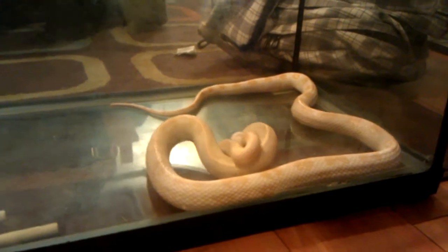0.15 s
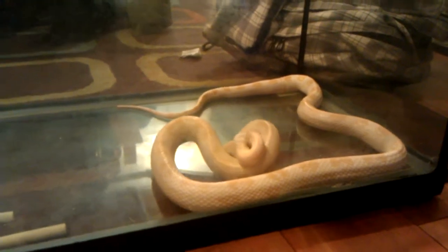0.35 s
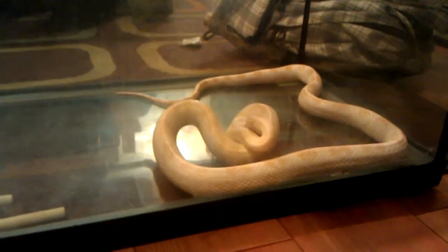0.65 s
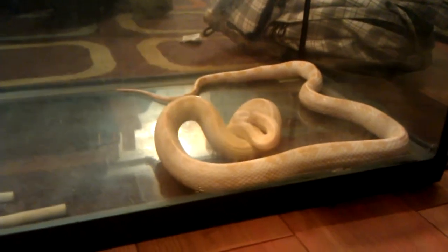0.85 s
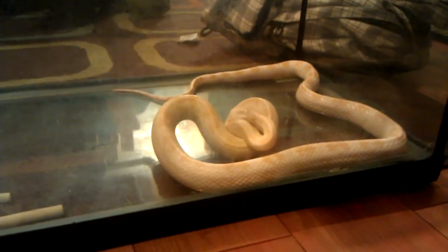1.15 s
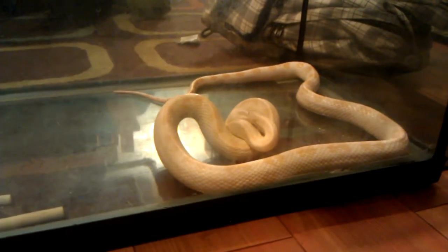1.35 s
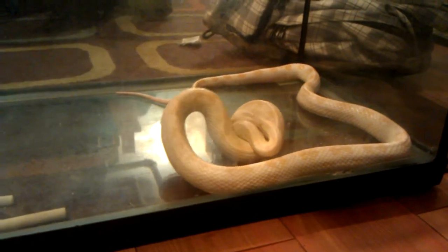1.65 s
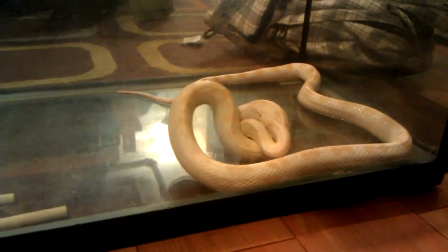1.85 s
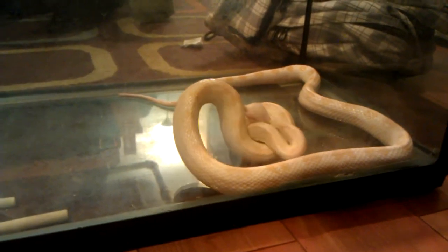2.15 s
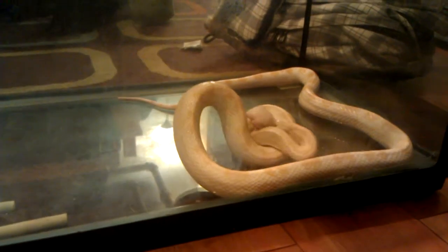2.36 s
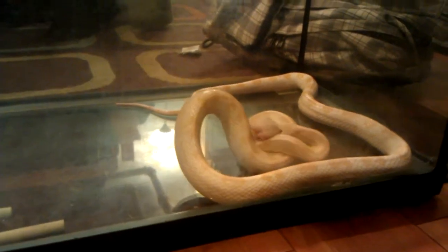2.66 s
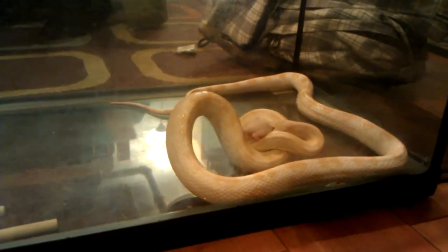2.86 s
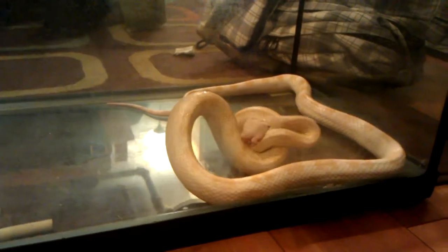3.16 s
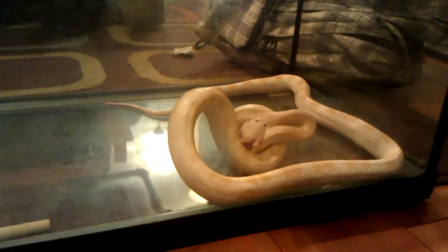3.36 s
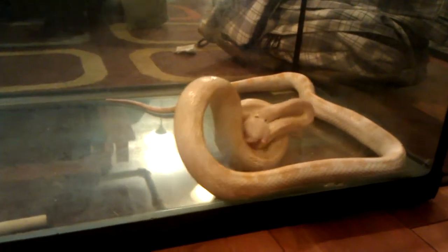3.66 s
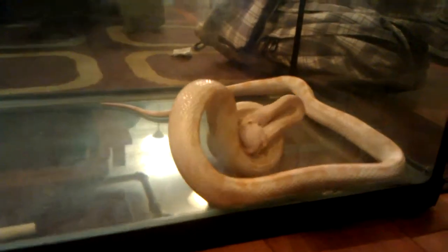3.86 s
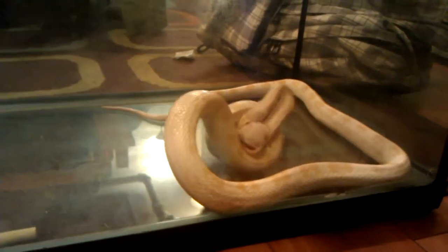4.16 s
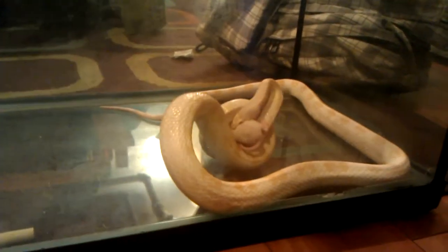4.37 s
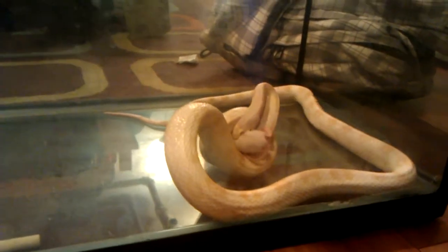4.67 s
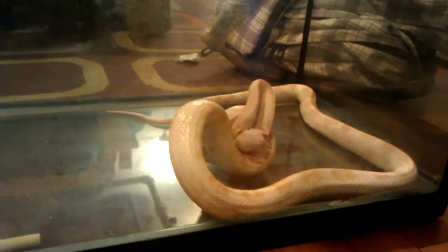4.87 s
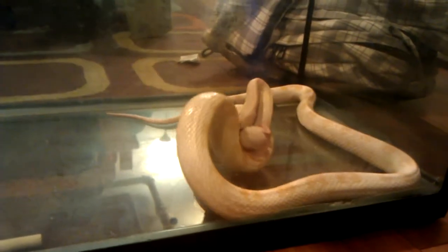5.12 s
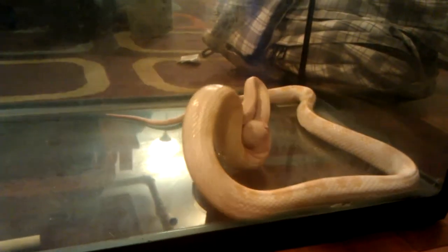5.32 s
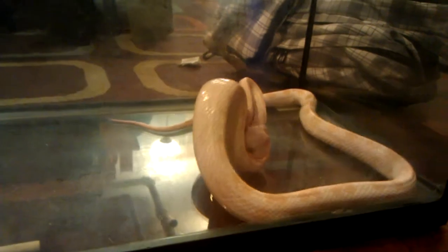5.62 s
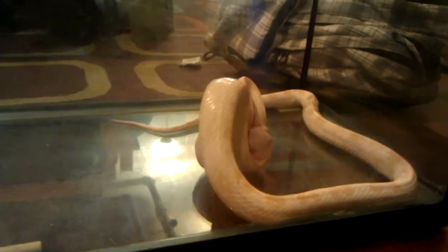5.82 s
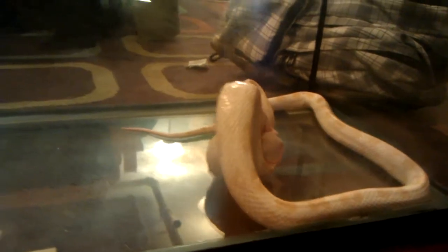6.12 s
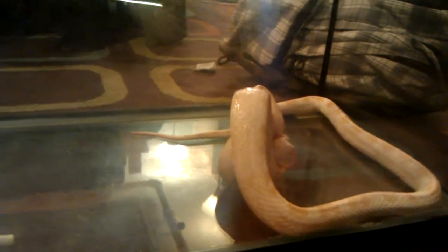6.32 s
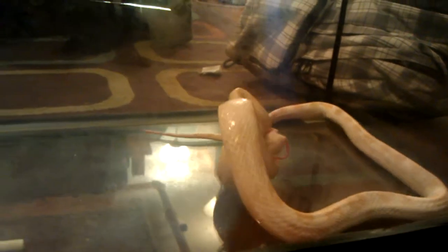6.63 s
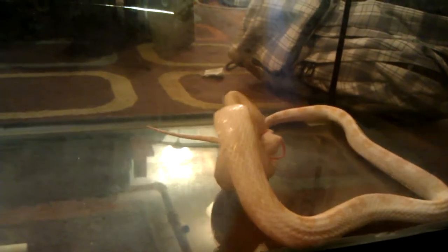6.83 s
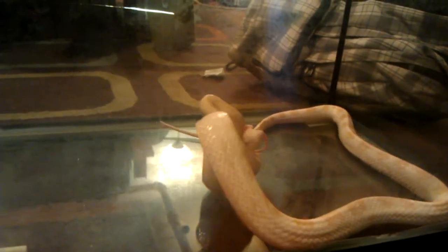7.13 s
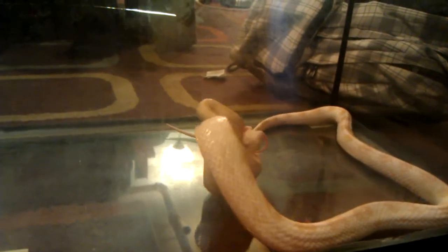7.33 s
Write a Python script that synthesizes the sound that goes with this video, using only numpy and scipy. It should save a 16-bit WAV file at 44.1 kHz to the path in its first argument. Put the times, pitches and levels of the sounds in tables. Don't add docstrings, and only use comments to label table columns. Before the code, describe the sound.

Seven short, strained rodent squeals ring reverberantly in a glass tank, with faint wheezes, soft scaly rubbing, low appliance hum and handling clicks.

```python
import sys
import numpy as np
from scipy import signal
from scipy.fft import rfft, irfft, next_fast_len
from scipy.io import wavfile
from scipy.ndimage import uniform_filter1d, map_coordinates

SR = 44100
rng = np.random.default_rng(int(sys.argv[2]) if len(sys.argv) > 2 else 0)


def unload_wav(signal):
    wavfile.write(
        sys.argv[1],
        SR,
        np.round(np.clip(np.atleast_2d(signal).T, -1, 1) * 32767).astype(np.int16),
    )


def linear_from_db(decibels):
    return 10 ** (np.asarray(decibels, float) / 20)


N = 330309
TIME = np.arange(N) / SR


def unit(x):
    return x / np.sqrt(np.mean(x ** 2) + 1e-20)


def along(points, hz):
    f, v = np.transpose(points)
    return np.interp(np.log(hz + 1), np.log(f + 1), v)


def curves(rows):
    s, *cols = np.transpose(rows)
    return [np.interp(TIME, s, c) for c in cols]


def gate(spans):
    inside = sum((TIME >= start) & (TIME <= end) for start, end in spans)
    return np.abs(uniform_filter1d(np.minimum(inside, 1.0), size=352))


def peak(s, db, rise, fade):
    return linear_from_db(db - np.where(TIME < s, rise * (s - TIME), fade * (TIME - s)))


def wobble(rate):
    knots = rng.standard_normal(int(N * rate / SR) + 4)
    return map_coordinates(knots, [TIME * rate])


def noise(gain):
    m = next_fast_len(N)
    spectrum = rfft(rng.standard_normal(m))
    hz = np.fft.rfftfreq(m, 1 / SR) + 1
    return unit(irfft(spectrum * gain(hz), m)[:N])


# frequency in Hz, level in dB per Hz.
ROOM_NOISE = [(26, -24), (74, -24), (100, -10), (140, -9), (220, -2.5), (300, -6.5), (420, -6), (640, -3.5),
              (950, -6.5), (1400, -9), (3900, -13), (5200, -21), (10000, -19), (15700, -21.5)]
# time in seconds, strength in dB.
ROOM_DB = [(0, -65), (.44, -63), (1.06, -66.5), (2.0, -66), (3.1, -64.5), (5.3, -65.5), (6.28, -64.5),
           (6.63, -66), (7.0, -64.5), (7.49, -65)]
# frequency in Hz, level in dB per Hz.
RUB = [(1200, -28), (2000, -2.5), (2800, -22.5), (3700, 0), (4600, 1.5), (5400, -6.5), (8000, -18),
       (15000, -33)]
# peak in seconds, spread in seconds, level in dB.
RUB_STROKES = [
    (0.3, .8, -63),
    (2.42, .15, -64),
    (3.18, .17, -58.5),
    (4.35, .14, -62),
    (5.15, .25, -63),
    (5.6, .2, -61),
    (6.15, .13, -62),
    (6.88, .13, -56),
]
# frequency in Hz, level in dB rms.
HUM = [(150.7, -80.5), (188.4, -78), (446.8, -81), (608.3, -79.5), (807.5, -78.5), (1604, -84.5),
       (1793, -82)]


def background():
    air_level = linear_from_db(curves(ROOM_DB)[0] + 1.5 + 0.8 * wobble(4))
    air = air_level * noise(lambda f: linear_from_db(along(ROOM_NOISE, f)))

    strokes = linear_from_db(-67)
    for s, spread, db in RUB_STROKES:
        strokes = strokes + linear_from_db(db) * np.exp(-((TIME - s) / spread) ** 2)
    rub = strokes * linear_from_db(-11.5 + 1.6 * wobble(4.46)) * noise(lambda f: linear_from_db(along(RUB, f)))

    beat_s, beat_peak_s, second_share = 4.1, 2.95, 0.65
    mains_hz, mains_db = 119.5, -79
    beat = np.abs(1 + second_share * np.exp(2j * np.pi * (TIME - beat_peak_s) / beat_s))
    mains_level = beat * linear_from_db(mains_db + 3.5 + 1.8 * wobble(9))
    mains = mains_level * np.sin(2 * np.pi * mains_hz * TIME + 0.4 * wobble(10))

    motor = np.zeros(N)
    for hz, db in HUM:
        motor += linear_from_db(db + 2 + 2.7 * wobble(14)) * np.sin(2 * np.pi * hz * TIME + 1.1 * wobble(8))
    return air + rub + mains + motor


# start in seconds, click level in dB, click t60 in seconds,
# snap level in dB, case thud level in dB.
TICKS = [
    (1.2741, -50, .0055, -41.5, -48.5),
    (3.6278, -27.5, .0086, -51, -60),
    (6.8064, -59, .0055, -56, -60),
    (7.1011, -47, .006, -46, -55),
]


def ticks():
    click_hz, thud_hz = 4150, 217
    out, t = np.zeros(N + SR), np.arange(SR // 8) / SR
    for s, click_db, t60, snap_db, thud_db in TICKS:
        ring = np.sin(2 * np.pi * click_hz * t)
        ring += 0.5 * np.sin(2 * np.pi * 1.21 * click_hz * t)
        ring += 0.13 * np.cos(2 * np.pi * 800 * t)
        click = linear_from_db(click_db - 60 * t / t60) * ring
        snap = linear_from_db(snap_db - 60 * t / 0.005) * uniform_filter1d(rng.standard_normal(len(t)), size=5)
        thud = linear_from_db(thud_db - 60 * (t / 0.066) ** 2) * np.sin(2 * np.pi * thud_hz * t)
        thud *= 1 - np.exp(-t / 0.003)
        out[round(s * SR):][:len(t)] += click + snap + thud
    bass_cut = signal.butter(2, 130, "highpass", fs=SR, output="sos")
    return signal.sosfilt(bass_cut, out[:N])


def resonances(modes):
    def gain(f):
        return sum(linear_from_db(db) * (f * w) ** 2 / ((c * c - f * f) ** 2 + (f * w) ** 2) for c, w, db in modes)
    return gain


def breath(rows):
    return sum(gate([(start, end)]) * peak(top, db, 24 / (top - start), fade)
               for start, top, end, db, fade in rows)


# frequency in Hz, width in Hz, level in dB.
MOUTH = [(2000, 560, -6), (3300, 1200, -2.5), (4160, 1200, 3.5), (4900, 600, -2), (6400, 900, -9)]
NOSE = [(7940, 4500, 3), (9900, 1600, -8.5)]
# start, peak and end in seconds,
# peak level in dB, fade in dB per second.
MOUTH_GASPS = [
    (2.0, 2.05, 2.13, -63, 200),
    (6.63, 6.686, 6.78, -55, 110),
    (6.76, 6.8, 7.13, -63, 12),
]
NOSE_GASPS = [
    (2.0, 2.054, 2.13, -61.5, 260),
    (6.63, 6.775, 7.1, -58, 100),
]
# start in seconds, length in seconds,
# start pitch in Hz, end pitch in Hz, level in dB.
WHISTLES = [(2.02, .04, 10220, 10030, -61), (2.041, .05, 9150, 7650, -57.5), (2.021, .036, 2520, 2440, -64),
            (3.511, .021, 3300, 4350, -53), (5.525, .03, 4350, 4050, -50.5),
            (6.336, .045, 3700, 4200, -50.5), (6.691, 0.047, 2250, 1820, -58),
            (6.675, .095, 4050, 3450, -55), (6.775, 0.1155, 3360, 3000, -57),
            (6.686, .035, 4500, 4960, -59), (6.752, .07, 4960, 4920, -62), (6.88, 0.099, 4050, 3850, -62),
            (7.05, .04, 4000, 4200, -62), (7.076, .045, 4860, 4910, -57.5)]


def gasps():
    mouth = breath(MOUTH_GASPS) * noise(resonances(MOUTH))
    nose = breath(NOSE_GASPS) * noise(resonances(NOSE))
    out = (mouth + nose) * linear_from_db(3.7 * wobble(35))
    waver, flutter = wobble(300), wobble(70)
    for s, length, start_hz, end_hz, db in WHISTLES:
        span = slice(round(s * SR), round((s + length) * SR))
        u = ((TIME[span] - s) / length).clip(0, 1)
        hz = (start_hz + (end_hz - start_hz) * u) * (1 + 0.023 * waver[span])
        swell = np.sqrt(np.abs(np.sin(np.pi * u)))
        out[span] += linear_from_db(db + 3.6 * flutter[span]) * swell * np.sin(2 * np.pi * np.cumsum(hz) / SR)
    return out


# time in seconds, pitch in Hz,
# effort in dB, mouth opening in dB per octave.
RISING = [(2.333, 1650, -59.5, -3), (2.35, 2144, -49.5, 1.5), (2.37, 2444, -41, 1), (2.4, 2640, -40, 2),
          (2.43, 2912, -32, -6), (2.478, 3151, -32.5, -3), (2.54, 3360, -33.5, 1.2),
          (2.585, 3404, -36, 6.5), (2.636, 2900, -41.5, -3)]
HIGH = [(2.858, 2900, -69, -19), (2.872, 3194, -52.5, -13), (2.885, 3380, -43, -4.5),
        (2.91, 3530, -34.5, 1.5), (2.95, 3665, -28.5, 4.5), (2.995, 3600, -33.5, 4),
        (3.085, 3600, -37, 2.2), (3.105, 3280, -41, -1.5), (3.124, 3150, -46, -5)]
STEPPED = [(3.503, 1510, -66.5, -4.5), (3.536, 2343, -61, -1.5), (3.545, 3110, -52.5, -7),
           (3.625, 3040, -43.5, -2.2), (3.636, 3300, -36.5, -3), (3.67, 3552, -34.5, 0.6),
           (3.71, 3423, -40, 1.5), (3.795, 3363, -35.5, 4), (3.81, 2930, -45, -7.5)]
ARCHED = [(4.11, 2410, -65.5, -5), (4.137, 2690, -56.5, -2.2), (4.157, 3100, -45.5, -3.5),
          (4.2, 3246, -38, 2.2), (4.256, 3418, -38.5, 1.5), (4.3, 3350, -35, 4.5),
          (4.352, 3297, -35.5, 5.5), (4.368, 2715, -42.5, 2.2), (4.4, 2650, -46.5, 3.5)]
WEAK = [(4.63, 2250, -83, -7), (4.655, 2830, -51, -4), (4.668, 3047, -44, -4), (4.715, 3060, -42, -1.2),
        (4.75, 3247, -41.5, 4), (4.8, 3255, -38, 2.5), (4.85, 3150, -45.5, 5), (4.923, 2960, -47.5, -0.6),
        (4.955, 2840, -50.5, -4)]
FLAT = [(5.22, 2300, -69, -5.5), (5.238, 2740, -55.5, -7), (5.255, 2945, -48.5, -1.5),
        (5.31, 2930, -43.5, 1.2), (5.36, 2900, -41, -0.6), (5.37, 3070, -38, 0.3), (5.434, 3100, -45, 0.3),
        (5.468, 2990, -39, -1.5), (5.51, 2910, -55, -1.5)]
LONG = [(5.908, 2655, -61, -8), (5.93, 2800, -42, 2.2), (5.953, 3080, -41.5, -1.2), (6.0, 3010, -39, 1.2),
        (6.035, 3170, -32.5, 1.2), (6.09, 3130, -38, 1.5), (6.175, 3164, -43, 0.3),
        (6.215, 3050, -40.5, -0.6), (6.3, 2930, -51, 1.5)]
SQUEALS = [RISING, HIGH, STEPPED, ARCHED, WEAK, FLAT, LONG]
# let-go length in seconds, opening puff in dB,
# closing burst in dB, burst length in seconds, last mouth opening in dB per octave.
BREAKS = [
    (.016, -45, -42.5, .006, 4.5),
    (.014, -63, -48, .008, -1.5),
    (.05, -55, -50, .022, 7.5),
    (.018, -56, -48, .04, -1.5),
    (.02, -55, -53, .012, 5),
    (.035, -56, -50.5, .064, -2.5),
    (.045, -55, -57, .06, -2.2),
]
# time in seconds, share of pitch dropped.
CRACKS = [(2.439, .04), (2.5, .05), (2.893, .051), (2.907, .04), (2.929, .045), (3.573, .075),
          (3.605, .058), (3.654, .053), (4.703, .07), (5.444, .06), (5.962, .09), (5.978, .095),
          (6.003, .088), (6.052, .07), (6.09, .1), (6.131, .02), (6.229, .045), (6.253, .07), (6.279, .045)]
# frequency in Hz, level in dB.
THROAT = [(1500, 0.5), (2500, -9.5), (3300, -5), (5000, -3.5), (6500, 2.5), (8000, -6), (10000, -8.5),
          (12500, -13.5), (14200, -23), (16000, -9)]
# frequency in Hz, level in dB per Hz.
AIR = [(1250, -58), (1850, -7.5), (2850, -4), (4250, 3), (6100, -2), (8400, 6), (10800, -3), (12500, -16),
       (14000, -24), (15900, -31)]


def squeals():
    rows, spans, air = [], [], np.zeros(N)
    for squeal, (let_go, puff_db, burst_db, burst_s, last_mouth) in zip(SQUEALS, BREAKS):
        start, (last, hz, db, _) = squeal[0][0], squeal[-1]
        end = last + let_go
        rows += [*squeal, (end, 0.68 * hz, db - 11, last_mouth)]
        spans.append((start, end))
        inside = (TIME > start - 0.01) & (TIME < end + 0.01)
        puff = peak(start + 0.02, puff_db, rise=450, fade=380)
        burst = peak(end - burst_s, burst_db, rise=600, fade=15)
        air += inside * (puff + burst)
    pitch, voice_db, bright = curves(rows)
    air = air + linear_from_db(voice_db - 35)
    leak = np.clip(air / linear_from_db(voice_db), 0, 1)

    roughness = (0.00512 + 0.06 * leak) * wobble(400)
    pitch = pitch * (1 + 0.00401 * wobble(35) + 0.00814 * wobble(110) + roughness)
    crack_s = 0.0052
    for s, drop in CRACKS:
        near = slice(round((s - 0.04) * SR), round((s + 0.04) * SR))
        pitch[near] *= 1 - drop * np.exp(-((TIME[near] - s) / crack_s) ** 2)

    phase = 2 * np.pi * np.cumsum(pitch) / SR
    order = np.arange(1, 9)[:, None]
    on, tone = gate(spans) > 0, np.zeros(N)
    harmonic_hz = order * pitch[on]
    level_db = along(THROAT, harmonic_hz) + bright[on] * np.log2(order / 2) + 1.0 * wobble(90)[on]
    harmonics = linear_from_db(level_db) * np.sin(order * phase[on]) * (harmonic_hz < SR / 2.4)
    tone[on] = np.sum(harmonics, axis=0)

    dull = noise(lambda f: linear_from_db(along(AIR, f)) / (1 + (f / 5500) ** 6))
    sharp = noise(lambda f: linear_from_db(along(AIR, f)) / (1 + (5500 / f) ** 6))
    hiss = linear_from_db(-5.5 - 0.67 * bright) * dull + linear_from_db(-2.5 + 1.36 * bright) * sharp
    return gate(spans) * (linear_from_db(voice_db) * tone + air * linear_from_db(2.1 * wobble(120)) * hiss)


# frequency in Hz, t60 in seconds.
REVERB = [(1000, 0.43), (3000, 0.33), (6000, .3), (12000, 0.23)]


def reverberant(x, direct_db):
    hz, t, z = signal.stft(rng.standard_normal(SR // 2), SR, nperseg=256)
    decay = linear_from_db(-60 * t / along(REVERB, hz)[:, None])
    tail = signal.istft(z * decay, SR, nperseg=256)[1]
    tail = np.pad(tail / np.linalg.norm(tail), (40, 0))
    return linear_from_db(direct_db) * x + signal.fftconvolve(x, tail)[:N]


def scene():
    rat = reverberant(squeals() + gasps(), direct_db=-5)
    return (rat + background() + ticks())[None]


def band_limit(x):
    return signal.sosfilt(signal.butter(12, 15880, fs=SR, output="sos"), x)


def record(dry):
    bass_cut = signal.butter(1, 60, "highpass", fs=SR, output="sos")
    top_cut = signal.butter(24, 15700, fs=SR, output="sos")
    mix = signal.sosfilt(np.vstack([bass_cut, top_cut]), dry)
    return band_limit(mix)


dry = scene()
out = record(dry)
unload_wav(out)
```